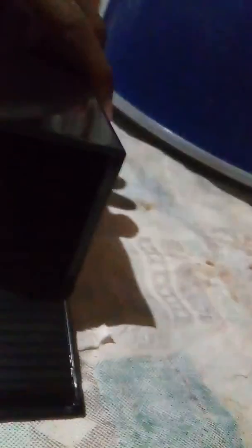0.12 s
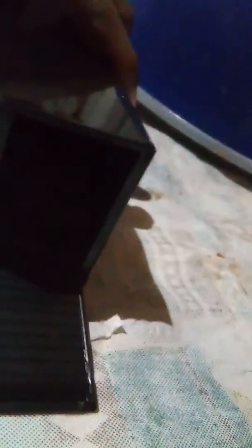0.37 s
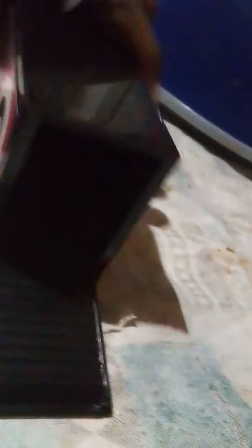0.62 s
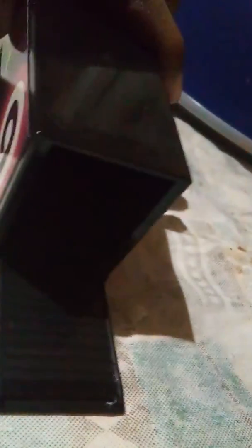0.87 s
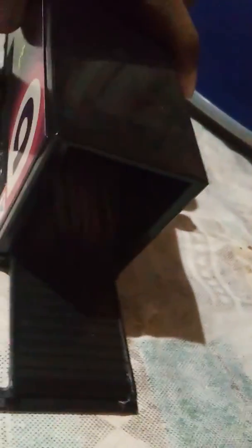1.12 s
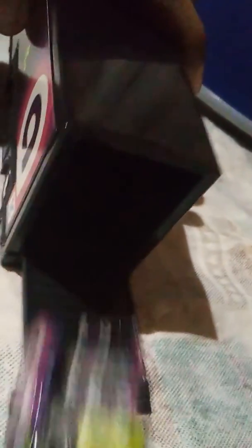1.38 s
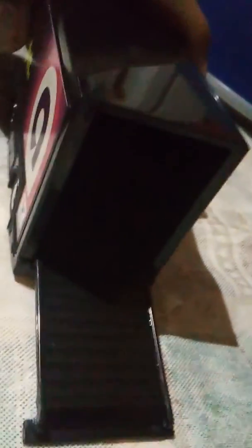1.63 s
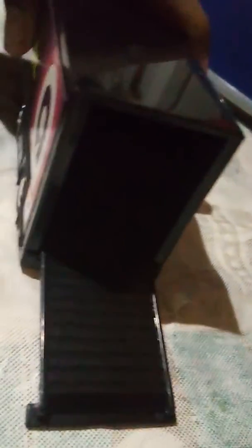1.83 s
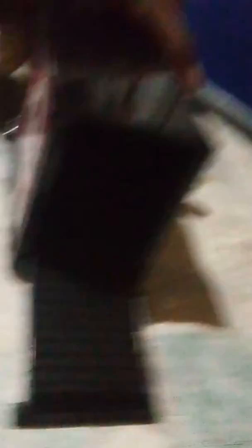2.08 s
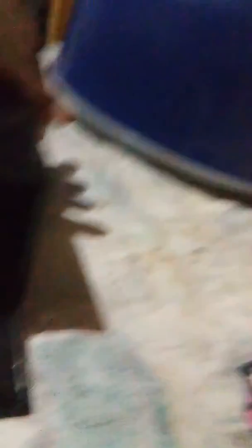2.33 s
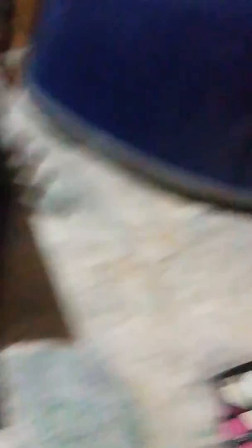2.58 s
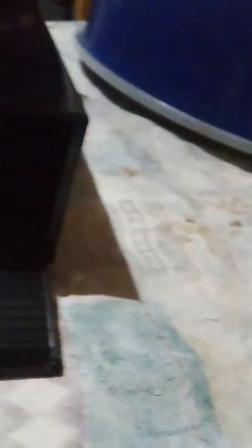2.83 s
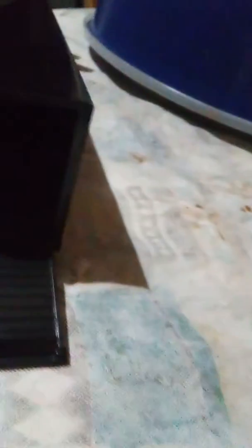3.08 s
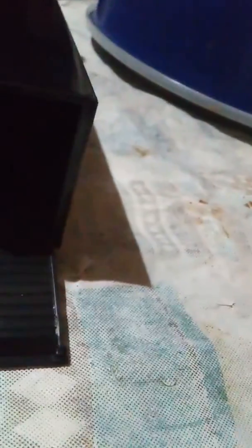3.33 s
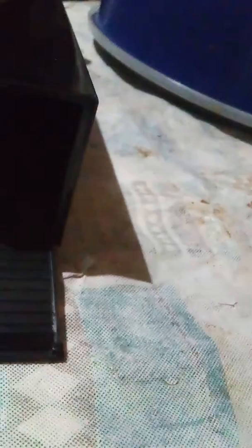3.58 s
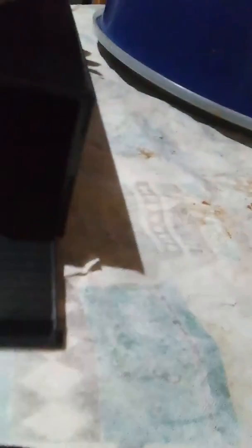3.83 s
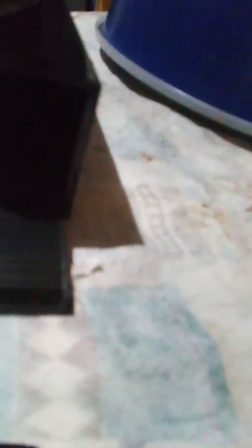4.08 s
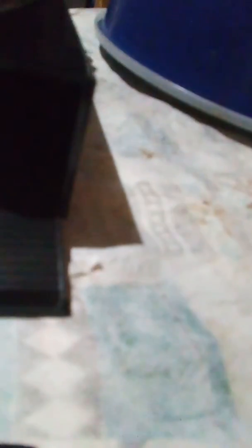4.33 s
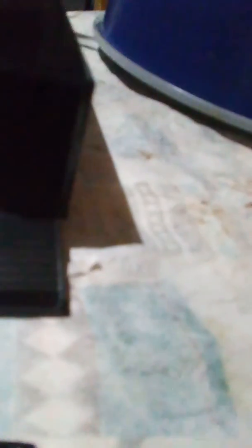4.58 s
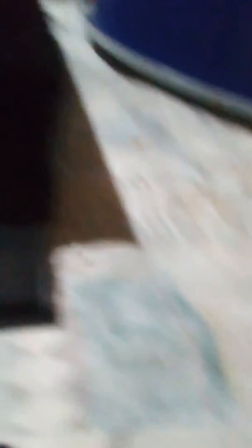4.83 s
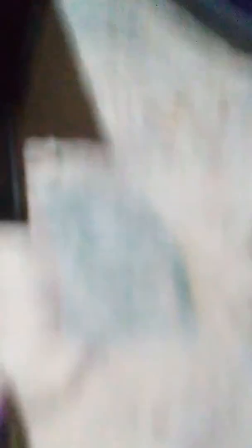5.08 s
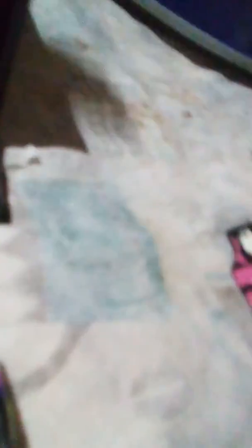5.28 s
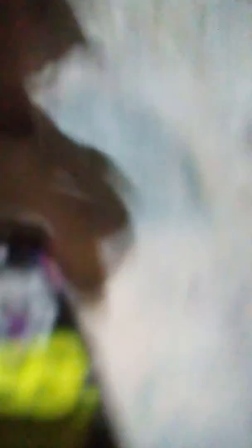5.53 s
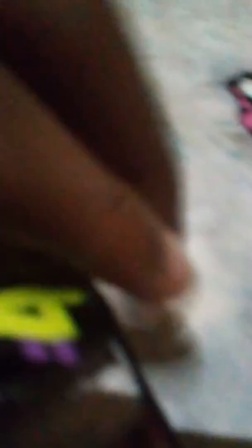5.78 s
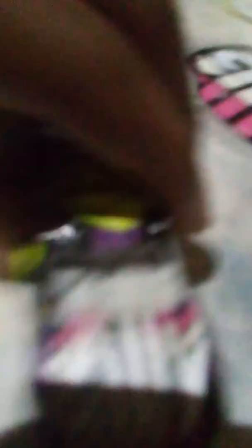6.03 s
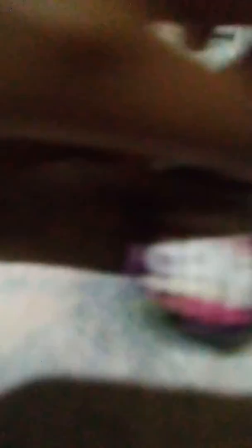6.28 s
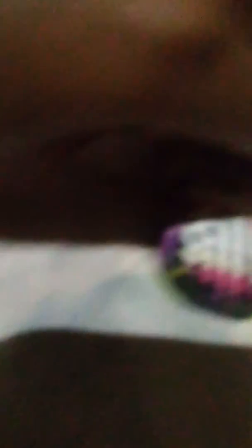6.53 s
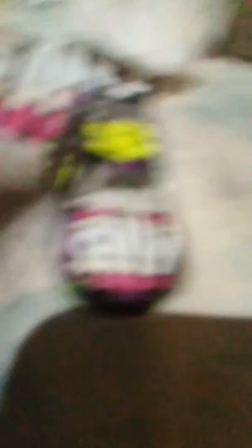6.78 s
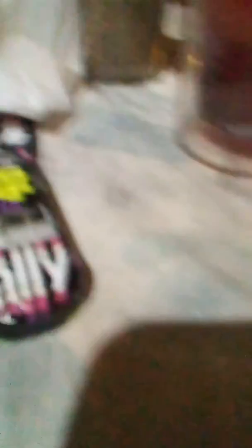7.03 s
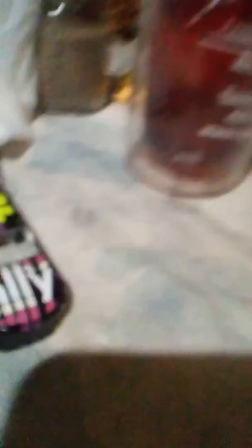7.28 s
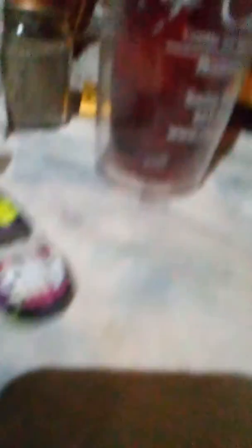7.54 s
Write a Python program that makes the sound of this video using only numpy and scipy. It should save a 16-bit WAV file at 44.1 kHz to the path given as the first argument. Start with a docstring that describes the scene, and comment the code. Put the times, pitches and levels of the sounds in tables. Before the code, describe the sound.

Dry plastic clatter of a toy rolling out of a hollow box, followed by sparse knocks, cloth rubbing and close finger ticks in a small room.

```python
"""A hand tilts a hollow plastic box on a cloth-covered table; early on a toy car rattles down its ribbed ramp.
More knocks on the box follow, then the car is set down on the table and picked up again.
Each hit is a burst of noisy force that rings the box walls; thuds are ringing modes of the table top.
All along, hands and toy rub in shaped noise and fingers shift and tick on the phone held close.
A small room answers the hits, over faint tones and a hiss."""
import sys
import numpy as np
from scipy import signal
from scipy.fft import rfft, irfft, next_fast_len
from scipy.io import wavfile
from scipy.ndimage import uniform_filter1d, map_coordinates

SR = 44100
rng = np.random.default_rng(int(sys.argv[2]) if len(sys.argv) > 2 else 0)


def transcribe(signal):
    """Save signal, clipped to [-1, 1], as a 16-bit WAV file at the path in sys.argv[1]."""
    frames = np.atleast_2d(signal).T
    limited = np.clip(frames, -1, 1)
    pcm = np.round(limited * 32767).astype(np.int16)
    wavfile.write(sys.argv[1], SR, pcm)


def volts_from_decibels(level):
    """Turn decibel levels (scalar or array-like) into linear amplitude factors."""
    exponent = np.asarray(level, float) / 20
    return 10 ** exponent


N = 337351  # length [samples]

# rubbing noise that stays between strokes: cloth, scrape, finger, scuff, rumble (level [dB])
STILL_DB = [-86.5, -84, -88.5, -82.5, -84.5]
SLOPE_DB = 12  # a swell has lost this much one rise before and one fall after its loudest moment


def unit(x):
    """Scale to rms 1."""
    return x / np.sqrt(np.mean(x ** 2) + 1e-20)


def along(points, hz):
    """Read a curve of (frequency [Hz], value) points on a log frequency axis."""
    point_hz, value = np.transpose(points)
    return np.interp(np.log(hz + 1), np.log(point_hz + 1), value)


def coloured(x, spectrum):
    """Give x the tone colour of a (frequency [Hz], level [dB]) spectrum."""
    size = next_fast_len(len(x) + 8192)
    gain = volts_from_decibels(along(spectrum, np.fft.rfftfreq(size, 1 / SR)))
    return irfft(rfft(x, size) * gain, size)[:len(x)]


def wobble(rate):
    """A smooth random curve with rate knots a second (60 at most)."""
    knots = rng.standard_normal(int(N * 60 / SR) + 4)
    return map_coordinates(knots, [np.arange(N) * min(rate, 60) / SR])


def rush(spectrum, patchy_db, grain_db, flutter_db, size=5):
    """Noise of rms 1 with uneven grains, patches of gain (size bins wide) and a fast flutter."""
    grains = rng.standard_normal(N) * volts_from_decibels(grain_db * rng.exponential(1, N))
    bins = signal.stft(grains, nperseg=512)[2]
    field = uniform_filter1d(rng.standard_normal(bins.shape), size=size, axis=0)
    field = uniform_filter1d(field, size=10, axis=1)
    noise = signal.istft(bins * volts_from_decibels(patchy_db * unit(field)), nperseg=512)[1][:N]
    return unit(coloured(noise, spectrum) * volts_from_decibels(flutter_db * wobble(30)))


def swell(s, rise, fall):
    """Gain of one stroke: a rounded top with separate rise and fall [s]."""
    t = np.arange(N) / SR - s
    width = np.where(t < 0, max(rise, .005), max(fall, .005))
    return volts_from_decibels(-SLOPE_DB * np.clip(t / width, -4, 4) ** 2)


def strokes(rows):
    """Gain per sample for each level column; overlapping strokes add in power."""
    power = 0
    for s, rise, fall, *levels in rows:
        power = power + (volts_from_decibels(np.array(levels))[:, None] * swell(s, rise, fall)) ** 2
    return np.sqrt(power)


def box(contacts, ring, bite, snap_db):
    """A chattering contact force cracks, snaps and rings the box walls, a little differently each time.

    ring scales the walls' ringing time, bite is how suddenly the force starts,
    snap_db is the snap's level over the bright modes [dB]."""
    # walls and cavity: (frequency [Hz], relative level [dB], time to fall 60 dB before scaling by ring [s])
    wall_modes = [(1035, -12.5, .045), (1133, -9.5, 0.046), (1290, -15, 0.033), (1413, -15.5, .03),
                  (1592, 0.5, 0.032), (1675, 2.5, 0.035), (1785, -9, 0.037), (1920, -17.5, 0.057),
                  (2217, -14, .03), (2414, -2, .012), (2700, 3.5, 0.013), (2945, 1.5, .016),
                  (3180, -3.5, 0.014), (3385, 2.5, .014), (3700, -2.5, 0.014), (4280, 5, .01),
                  (5040, 0.5, .012), (5400, -3.5, 0.03), (5800, -7, .012), (7240, -10.5, 0.014)]
    # where hollow modes give way to middle ones, and middle to bright: frequency [Hz]
    borders = [2300, 4000]
    # snap of hard plastic: (frequency [Hz], relative level [dB])
    snap_colour = [(4880, -30), (8300, 0.5), (9890, 3), (13500, -16), (14900, -1), (15800, -2.5),
                   (16300, -39)]
    # crack of the contact: (frequency [Hz], relative level [dB])
    crack_colour = [(2500, -40), (3600, -3), (5000, 0), (7000, -2), (7900, -14), (8800, -40), (10000, -70)]
    firm_blows = .55  # dB gained by the large side walls per dB of hollow level
    first_blow = 1.3  # the first sharp push of a short contact, over the chatter that follows
    out, t = np.zeros(N + SR), np.arange(SR // 8) / SR
    plastic = signal.butter(4, [900, 7500], "band", fs=SR, output="sos")
    for s, hollow_db, middle_db, bright_db, ms in contacts:
        ms = max(ms, .5)
        u = t[:SR // 12] / (ms / 1000)  # time in contact lengths
        force = rng.standard_normal(len(u)) * volts_from_decibels(.8 * rng.exponential(1, len(u)))
        force *= (1 - np.exp(-bite * u)) * np.exp(-1.5 * u ** 2)
        blow = force.copy()
        blow[20] += first_blow * np.exp(-ms / 10) * np.linalg.norm(force)
        rings = np.zeros((3, len(t)))  # hollow, middle, bright
        for hz, level, t60 in wall_modes:
            spot_hz = hz * rng.normal(1, .015)
            spot_db = level + rng.normal(0, 2.5)
            if hz < 1300:  # only firm blows reach the large side walls
                spot_db += firm_blows * (hollow_db + 32.5)
            decay = volts_from_decibels(spot_db - 60 * t / (ring * t60))
            onset = 1 - np.exp(-t * hz / 2)
            rings[np.searchsorted(borders, hz)] += decay * np.sin(2 * np.pi * spot_hz * t) * onset
        rung = signal.fftconvolve(rings, blow[None], axes=1)[:, :len(t)]
        parts = list(signal.sosfilt(plastic, rung))
        force = np.pad(force, (0, len(t) - len(force)))
        parts[2] = unit(parts[2]) + 4.3 * unit(coloured(force, crack_colour))
        parts.append(coloured(force, snap_colour))
        contact = round(ms * SR / 1000) + 20  # levels hold over this stretch [samples]
        for part, db in zip(parts, (hollow_db, middle_db, bright_db, bright_db + snap_db)):
            out[round(s * SR):][:len(t)] += volts_from_decibels(db) * part / np.sqrt(np.mean(part[:contact] ** 2))
    return out[:N]


def chatter(count):
    """Small random hits of the wheels between the clear ones, as rows for box()."""
    # the car rolls down the ramp: (from [s], to [s])
    ride_span = (.83, 1.33)
    # typical hit: hollow, middle, bright (level [dB])
    typical_db = [-54, -43.5, -41]
    times = rng.uniform(*ride_span, (count, 1))
    levels = typical_db + 4 * rng.standard_normal((count, 3))  # scatter 4 dB
    return np.hstack([times, levels, np.full((count, 1), 2.5)])  # contact 2.5 ms


def car_ride():
    """The car's wheels hit the ribs of the ramp and rattle the box."""
    # clearest hits: (time [s], hollow level [dB], middle level [dB], bright level [dB], contact [ms])
    rib_hits = [(.836, -32.5, -27, -31, 3.3), (.8453, -30, -43, -30, 3.8), (.8539, -41, -29.5, -30.5, 2.3),
                (.8761, -38, -35, -44, 3.8), (.9054, -40, -29.5, -39.5, 3), (.9264, -31, -38, -30, 2.2),
                (.9366, -42.5, -29.5, -27.5, 1.4), (.9567, -36.5, -35, -42.5, 1.8),
                (.992, -29, -26.5, -33.5, 6.1), (1.0179, -30, -24.5, -30, 3.3),
                (1.0332, -30, -32.5, -33, 8.5), (1.0696, -41.5, -35, -33, 6.9),
                (1.082, -36.5, -42, -34, 5.1), (1.1185, -39, -44, -29.5, 8.4),
                (1.124, -30.5, -31, -38.5, 14), (1.1561, -43, -36, -25.5, 6.2),
                (1.1631, -39.5, -35, -33.5, 8.1), (1.198, -44.5, -31.5, -29.5, 15),
                (1.216, -42, -34, -28.5, 15), (1.2328, -47, -33, -21, 4.7), (1.239, -42.5, -28, -23.5, 7.3),
                (1.269, -51, -32, -32, 8.1), (1.2759, -50.5, -51, -28, 3.2),
                (1.2899, -37.5, -39.5, -27.5, 3.6), (1.298, -38, -39.5, -25.5, 4.4),
                (1.3067, -53.5, -39, -28.5, 6.4), (1.3562, -41, -26.5, -28, 3.6),
                (1.368, -36, -50, -47, 4.6)]
    return box(np.vstack([rib_hits, chatter(count=45)]), ring=0.64, bite=13, snap_db=-12.5)


def box_knocks():
    """Single knocks make the hollow box ring."""
    # (time [s], hollow level [dB], middle level [dB], bright level [dB], contact [ms])
    knock_rows = [(.0392, -44, -48, -82, 6.4), (.2657, -74, -36, -45, 2.2), (.2849, -42.5, -40, -46.5, 6.4),
                  (.4769, -58, -85, -79, 9.4), (.5546, -58.5, -56.5, -63, 8.3), (.683, -49, -90, -70, 4.7),
                  (.7587, -53, -58, -80, 5.9), (.78, -50, -57.5, -64, 10), (1.4737, -45.5, -51.5, -63, 3.5),
                  (1.5495, -50, -56, -59, 5.4), (1.5818, -35.5, -28.5, -29.5, 5.5),
                  (1.6032, -35, -46, -38.5, 3.8), (1.6777, -46.5, -41, -50, 3.7),
                  (1.723, -42.5, -36, -45, 1.47), (1.741, -52.5, -54, -70, 19),
                  (3.151, -67.5, -92, -75, 65), (3.2621, -57.5, -73.5, -76.5, 8.7),
                  (3.3132, -56.5, -63, -62, 29), (3.336, -52.5, -57.5, -70.5, 9.3),
                  (3.388, -53, -79, -78, 7), (3.5892, -30.5, -35, -35.5, 3.1), (3.599, -44, -65, -45, 6),
                  (3.8069, -58.5, -51, -69, 9.3), (3.98, -58.5, -77.5, -75, 20),
                  (4.0048, -26, -32, -36.5, 8.8), (4.0424, -45, -52, -41, 4.8),
                  (4.0553, -29, -29.5, -44, 6.9), (4.1801, -43, -52.5, -78, 1.27),
                  (4.3352, -43.5, -77, -76.5, 5.1), (4.6366, -64.5, -78.5, -79, 12),
                  (4.806, -54.5, -75, -62, 6.1), (5.4007, -56.5, -61, -64.5, 28),
                  (5.5262, -57, -68, -66, 11.6)]
    return box(knock_rows, ring=0.7, bite=13, snap_db=-30.5)


def set_downs():
    """The car is set down on the table: the same modes, struck with a more sudden force."""
    # (time [s], hollow level [dB], middle level [dB], bright level [dB], contact [ms])
    drop_rows = [(5.8358, -48, -44.5, -63, 7.4), (5.9473, -61, -49.5, -49.5, 3.4),
                 (6.2447, -27, -30, -43, 10.3), (6.256, -42.5, -56, -57, 23), (6.2681, -56, -34, -59, 1),
                 (6.3895, -40, -39, -44, 3.1), (6.5903, -40, -37.5, -56, 1.66), (7.1001, -58, -50, -47, 1)]
    return box(drop_rows, ring=0.73, bite=36, snap_db=-25)


def thuds():
    """The table top thuds under the car: its low modes ring at new strengths each time."""
    # (time [s], level [dB])
    thud_rows = [(2.04, -52), (5.525, -51.5), (5.836, -50.5), (6.2447, -41), (6.39, -32.5), (6.966, -52),
                 (6.99, -52.5), (7.101, -46)]
    # table top modes: (frequency [Hz], relative level [dB], time to fall 60 dB [s])
    table_modes = [(379, -2.5, 0.056), (520, -2, 0.057), (720, -1.5, 0.035), (1005, 2.5, 0.037)]
    out, t = np.zeros(N + SR), np.arange(SR // 8) / SR
    for s, db in thud_rows:
        ring = np.zeros(len(t))
        for hz, level, t60 in table_modes:
            spot_db = level + rng.normal(0, 2)
            ring += volts_from_decibels(spot_db - 60 * t / t60) * np.sin(2 * np.pi * hz * t)
        out[round(s * SR):][:len(t)] += volts_from_decibels(db) * ring * (1 - np.exp(-t / .0006))
    return out[:N]


def cloth():
    """Hand, box or car sweeps over the cloth: a soft hiss of friction."""
    # (loudest time [s], rise [s], fall [s], level [dB])
    sweep_rows = [(.06, 0.24, 0.094, -53.5), (.255, 0.053, 0.12, -61), (.43, 0.069, 0.1, -72),
                  (.58, 0.058, 0.18, -71.5), (.74, 0.056, 0.037, -72.5), (.86, 0.05, 0.21, -43.5),
                  (1.07, 0.085, 0.097, -44), (1.2, 0.051, 0.14, -33.5), (1.42, 0.15, 0.092, -47.5),
                  (1.6, 0.045, 0.14, -60), (1.8, .04, .05, -62.5), (1.92, 0.083, 0.14, -55),
                  (2.115, .05, 0.099, -46), (2.215, 0.064, .06, -51), (2.57, 0.057, 0.12, -77),
                  (2.72, 0.055, 0.086, -69), (2.85, 0.097, 0.092, -63.5), (3.12, 0.16, 0.1, -65.5),
                  (3.335, 0.019, 0.074, -55), (3.5, 0.025, 0.086, -61.5), (3.61, 0.028, 0.084, -57.5),
                  (3.81, 0.029, 0.091, -60), (4.04, 0.027, 0.088, -49), (4.495, 0.045, 0.044, -70),
                  (4.79, 0.0535, 0.059, -71), (4.92, 0.095, 0.12, -58), (5.0, 0.035, 0.12, -62.5),
                  (5.29, 0.16, 0.25, -65.5), (5.43, 0.033, 0.072, -58.5), (5.56, 0.11, 0.3, -70.5),
                  (5.81, 0.055, 0.11, -54.5), (6.08, 0.21, 0.38, -57.5), (6.32, 0.1, 0.11, -53.5),
                  (6.43, 0.07, .2, -51.5), (6.68, .06, 0.064, -65.5), (6.8, 0.084, 0.079, -56),
                  (6.91, 0.06, 0.071, -45.5), (7.02, .05, .06, -62.5), (7.12, 0.054, 0.092, -56),
                  (7.28, 0.27, 0.41, -54.5), (7.6, 0.05, 0.17, -68)]
    # (frequency [Hz], relative level [dB])
    cloth_colour = [(900, -40.5), (1500, -15), (2500, -10.5), (3800, -3.5), (5700, 3.5), (6800, 2),
                    (7500, -4.5), (8300, -13), (13000, -30.5)]
    (gain,) = strokes(sweep_rows)
    noise = rush(cloth_colour, patchy_db=1.5, grain_db=1.5, flutter_db=1.2)
    return np.hypot(gain, volts_from_decibels(STILL_DB[0])) * noise


def creaks():
    """The hollow box creaks as it is tilted or squeezed: friction noise with its resonances."""
    # (loudest time [s], rise [s], fall [s], level [dB])
    creak_rows = [(.03, .08, 0.12, -64), (0.283, 0.019, 0.034, -46.5), (0.431, 0.03, 0.031, -60.5),
                  (.58, 0.011, 0.024, -63), (.75, 0.11, 0.056, -62.5), (.86, 0.08, .25, -42),
                  (1.07, 0.13, 0.11, -47), (1.2, 0.1, 0.18, -39.5), (1.4, 0.072, 0.1, -54.5),
                  (1.6, 0.018, 0.055, -46.5), (1.72, .06, 0.16, -64.5), (3.33, 0.076, 0.05, -60.5),
                  (3.61, 0.022, 0.03, -60.5), (3.81, .02, 0.036, -59.5), (3.93, 0.14, 0.074, -64.5),
                  (4.04, .03, 0.11, -46.5), (4.771, 0.096, 0.041, -67.5)]
    # the box under friction: (frequency [Hz], relative level [dB])
    creak_colour = [(600, -49), (900, -18), (1080, -5.5), (1300, -19.5), (1640, -1), (2000, -8.5),
                    (2300, -19.5), (2750, -10.5), (3300, -16), (5000, -59.5)]
    (gain,) = strokes(creak_rows)
    return gain * rush(creak_colour, patchy_db=2, grain_db=2, flutter_db=2.5, size=2)


def scrapes():
    """The car or the box edge scrapes along the table with uneven micro-slips."""
    # (loudest time [s], rise [s], fall [s], level [dB])
    scrape_rows = [(1.93, 0.035, 0.093, -56.5), (2.09, .05, 0.089, -59.5), (4.92, .03, 0.046, -64.5),
                   (5.43, 0.044, 0.077, -59), (5.549, .05, 0.14, -66.5), (5.81, 0.058, 0.35, -53.5),
                   (6.08, 0.12, 0.51, -51), (6.259, 0.033, 0.017, -44.5), (6.41, 0.054, 0.17, -52),
                   (6.92, 0.17, 0.084, -52.5), (7.11, 0.068, 0.14, -61.5), (7.282, 0.15, 0.15, -56),
                   (7.63, 0.3, 0.18, -71)]
    # (frequency [Hz], relative level [dB])
    scrape_colour = [(500, -44.5), (900, -19.5), (1300, -3.5), (2200, -5), (3200, -5.5), (4000, -6),
                     (5200, -29.5), (8800, -120)]
    (gain,) = strokes(scrape_rows)
    noise = rush(scrape_colour, patchy_db=2, grain_db=2, flutter_db=1.5, size=3)
    return np.hypot(gain, volts_from_decibels(STILL_DB[1])) * noise


def finger_slides():
    """A finger slides on the phone's shell: skin whispers in the treble."""
    # (loudest time [s], rise [s], fall [s], level [dB])
    slide_rows = [(.06, 0.19, .06, -69), (0.872, .03, 0.23, -68), (1.2, 0.079, .1, -48.5),
                  (1.42, 0.099, .07, -66.5), (1.922, .07, 0.096, -61), (2.1, .04, .1, -55),
                  (2.208, 0.073, .06, -65), (2.831, 0.071, .07, -80.5), (3.12, 0.19, .05, -77),
                  (3.335, .02, .06, -80), (4.039, 0.024, .04, -69.5), (4.921, 0.031, .05, -62.5),
                  (5.01, .05, 0.028, -66), (5.43, 0.067, 0.06, -83), (5.81, 0.025, .04, -66),
                  (6.1, 0.048, .15, -83), (6.32, .05, .04, -68.5), (6.46, .08, 0.16, -65),
                  (6.902, .05, .07, -54.5), (7.13, .04, 0.12, -64), (7.29, 0.064, 0.15, -64.5),
                  (7.6, .1, 0.19, -78)]
    # (frequency [Hz], relative level [dB])
    finger_colour = [(4710, -29), (8000, -9), (9380, -6.5), (12500, -12.5), (13500, -16), (14900, 7),
                     (16000, -15.5)]
    (gain,) = strokes(slide_rows)
    noise = rush(finger_colour, patchy_db=1, grain_db=2, flutter_db=1.5)
    return np.hypot(gain, volts_from_decibels(STILL_DB[2])) * noise


def grip():
    """The hand shifts its grip on the phone: skin scuffs and the grip rumbles."""
    # (loudest time [s], rise [s], fall [s], scuff level [dB], rumble level [dB])
    grip_rows = [(.03, 0.11, 0.078, -65.5, -70.5), (.285, 0.018, 0.083, -66.5, -66.5),
                 (.43, 0.036, 0.029, -64.5, -70), (.58, 0.023, 0.065, -78, -68),
                 (.87, 0.024, 0.1, -48.5, -60.5), (1.15, 0.36, 0.1, -52, -58),
                 (1.43, 0.18, 0.094, -60, -62), (1.58, 0.048, 0.061, -56.5, -70),
                 (1.735, 0.067, 0.059, -61.5, -59.5), (1.86, .01, 0.036, -59, -63),
                 (1.96, 0.039, 0.14, -53, -64), (2.07, 0.037, 0.034, -49.5, -48),
                 (2.14, 0.025, 0.026, -61.5, -62), (2.218, .05, 0.066, -73, -68),
                 (2.81, .08, 0.043, -72, -72), (3.13, 0.16, 0.017, -76.5, -81),
                 (3.331, 0.026, 0.12, -83, -73), (3.61, 0.026, 0.043, -65, -84),
                 (3.821, .03, 0.1, -78.5, -70), (4.041, 0.063, 0.075, -59, -61.5),
                 (4.655, 0.03, 0.048, -93, -68), (4.77, 0.038, 0.048, -72.5, -83.5),
                 (5.0, 0.1, 0.07, -70.5, -66.5), (5.15, 0.07, .07, -75.5, -75),
                 (5.42, 0.13, 0.08, -71, -77), (5.55, 0.023, 0.058, -67, -56),
                 (6.15, 0.15, 0.065, -68, -61), (6.26, 0.03, 0.037, -57.5, -78),
                 (6.33, 0.026, 0.12, -51.5, -64), (6.41, 0.014, .04, -47, -64),
                 (6.47, 0.06, 0.053, -48.5, -64), (6.551, 0.09, 0.067, -52.5, -54.5),
                 (6.76, 0.022, 0.23, -59.5, -63), (6.68, 0.097, 0.044, -75, -66),
                 (6.92, 0.063, 0.075, -51, -49), (7.03, .04, 0.063, -69, -61),
                 (7.12, 0.032, 0.054, -58.5, -51.5), (7.26, 0.059, 0.21, -54, -54.5),
                 (7.39, 0.13, 0.034, -73, -62), (7.63, 0.15, .1, -73, -57.5)]
    # (frequency [Hz], relative level [dB])
    scuff_colour = [(150, -21), (260, -6.5), (380, -0.5), (600, -2), (900, -5), (1200, -6), (1600, -16.5),
                    (2600, -100)]
    # (frequency [Hz], relative level [dB])
    rumble_colour = [(15, -54), (25, -15.5), (70, -2), (151, -3.5), (280, -12), (360, -40.5), (620, -120)]
    scuff_gain, rumble_gain = strokes(grip_rows)
    scuff = rush(scuff_colour, patchy_db=2.5, grain_db=2.5, flutter_db=3, size=1)
    rumble = rush(rumble_colour, patchy_db=2.5, grain_db=3, flutter_db=3)
    scuff = np.hypot(scuff_gain, volts_from_decibels(STILL_DB[3])) * scuff
    return scuff + np.hypot(rumble_gain, volts_from_decibels(STILL_DB[4])) * rumble


def ticks():
    """Skin lets go of the phone: a sharp tick and one sudden pull on the microphone that swings back."""
    # (time [s], tick level [dB], pull level [dB], pull time scale [ms], at least 0.15 is used)
    tick_rows = [(0.065, -29, -62, 0.56), (0.407, -62, -42.5, 2.1), (.437, -32.5, -66, 0.49),
                 (0.652, -41, -80, .5), (1.4243, -38.5, -32.5, 1.34), (1.4442, -35, -33.5, 0.28),
                 (1.712, -28, -29.5, 1.1), (1.8487, -25, -34, 0.61), (2.038, -37, -28, 0.52),
                 (2.785, -35.5, -50.5, 1), (3.945, -44, -62, 0.51), (4.891, -30, -60.5, 0.74),
                 (4.91, -18, -20.5, 0.21), (5.526, -56, -45.5, 0.35), (5.839, -60, -43, 0.35),
                 (6.109, -53, -49, 3.1), (6.2461, -52, -19.5, 0.13), (6.391, -51, -34, 0.32),
                 (6.551, -50, -33, 0.67), (7.103, -48, -28, 0.26), (7.141, -52, -54, 2.7),
                 (7.502, -60, -38.5, 0.096), (7.572, -55, -59, .2)]
    out, t = np.zeros(N + SR), np.arange(SR // 12) / SR
    tick = -np.sin(2 * np.pi * 5500 * t) * np.exp(-t / .00022) * (1 - np.exp(-t / .00005))
    for s, tick_db, pull_db, ms in tick_rows:
        u = t / (max(ms, .15) / 1000)
        pull = -np.cos(np.pi / 2 * u ** 0.8) * np.exp(-u / 3) * (1 - np.exp(-t / .0001))
        out[round(s * SR):][:len(t)] += volts_from_decibels(tick_db) * tick + volts_from_decibels(pull_db) * pull
    return out[:N]


def room(x):
    """Each frequency of the room's answer dies at its own speed; a new tail every third of a second."""
    # (frequency [Hz], time to fall 60 dB [s])
    room_decay = [(300, 0.53), (1500, 0.19), (6000, 0.063), (14000, 0.041)]
    out, step = np.zeros(N + 2 * SR), SR // 3
    for start in range(0, N, step):
        hz, t, bins = signal.stft(rng.standard_normal(step), SR, nperseg=256)
        decay = volts_from_decibels(-60 * t / along(room_decay, hz)[:, None])
        tail = signal.istft(bins * decay, SR, nperseg=256)[1]
        wet = signal.fftconvolve(x[start:start + step], tail / np.linalg.norm(tail))
        out[start + 130:][:len(wet)] += wet  # the answer starts 130 samples (3 ms) late
    return out[:N]


def hums():
    """Brief faint tones: plain sine waves that swell and fade."""
    # (loudest time [s], rise [s], fall [s], frequency [Hz], rms level [dB])
    tone_rows = [(.41, 0.021, 0.024, 537, -65), (.52, 0.057, 0.038, 540, -68),
                 (1.77, 0.02, 0.058, 520, -62), (1.85, .02, 0.084, 545, -63), (3.85, .05, .06, 540, -74),
                 (3.84, 0.017, 0.07, 154.2, -61.5), (4.029, 0.021, 0.078, 157, -53),
                 (4.65, 0.011, 0.021, 159.7, -58), (5.13, 0.028, 0.027, 1352, -72),
                 (5.18, 0.024, .05, 1384, -73.5), (2.37, .03, 0.038, 1630, -75),
                 (2.9, 0.027, 0.033, 1740, -74.5), (3.3, 0.059, .04, 2700, -72.5)]
    out, t = np.zeros(N), np.arange(N) / SR
    for s, rise, fall, hz, db in tone_rows:
        out += np.sqrt(2) * volts_from_decibels(db) * swell(s, rise, fall) * np.sin(2 * np.pi * hz * t)
    return out


def wandering_tones(count):
    """Thin, short, faint, slightly gliding sine tones at random times."""
    low_hz, high_hz, width_s = 913, 4960, 0.025
    out, t = np.zeros(N + SR), np.arange(SR // 4) / SR
    for when, pitch, size, glide in rng.random((count, 4)):
        hz = low_hz * (high_hz / low_hz) ** pitch * (1 + (glide - .5) * t)
        peak_db = -85 + 10 * size
        shape = volts_from_decibels(peak_db - SLOPE_DB * ((t - t[-1] / 2) / width_s) ** 2)
        out[int(when * N):][:len(t)] += shape * np.sin(2 * np.pi * np.cumsum(hz) / SR)
    return out[:N]


def faint_hiss():
    """A steady, slightly patchy noise behind everything."""
    # (frequency [Hz], relative level [dB])
    hiss_colour = [(15, -32.5), (25, -1), (43, 10), (200, 9), (641, -9.5), (1290, -0.5), (3620, -12.5),
                   (4140, -22.5), (6560, -1), (9070, -26), (13000, -28.5), (15500, -20.5), (16000, -23)]
    return volts_from_decibels(-77.5) * rush(hiss_colour, patchy_db=2.5, grain_db=0.5, flutter_db=-1.0, size=1)


def scene():
    """Box and car in the room, rubbing, the phone in the hand, the table, faint tones and the hiss."""
    hits = car_ride() + box_knocks() + set_downs()
    answer = volts_from_decibels(-12) * room(hits)
    rubbing = cloth() + creaks() + scrapes() + finger_slides() + grip()
    background = hums() + wandering_tones(count=90) + faint_hiss()
    return (hits + answer + thuds() + rubbing + ticks() + background)[None]


def band_limit(x):
    """A steep low-pass at the top of the band."""
    return signal.sosfilt(signal.butter(12, 16680, fs=SR, output="sos"), x)


def record(dry):
    """The phone's microphone drops the deepest bass, below about 70 Hz."""
    bass_cut = signal.butter(3, 70, "high", fs=SR, output="sos")
    return band_limit(signal.sosfilt(bass_cut, dry))


dry = scene()
out = record(dry)
transcribe(out)
```